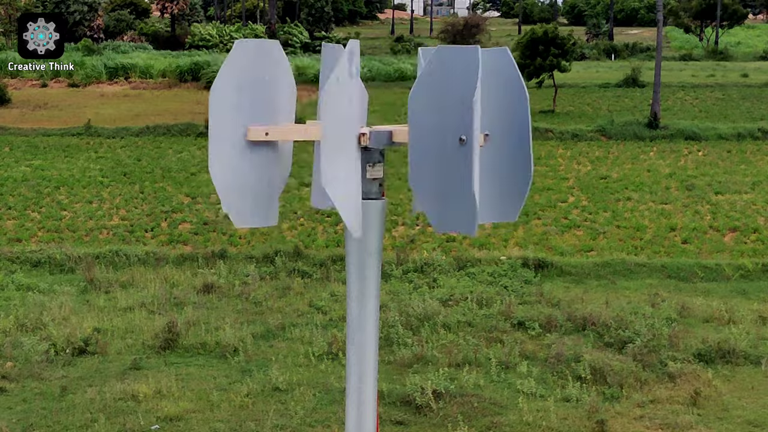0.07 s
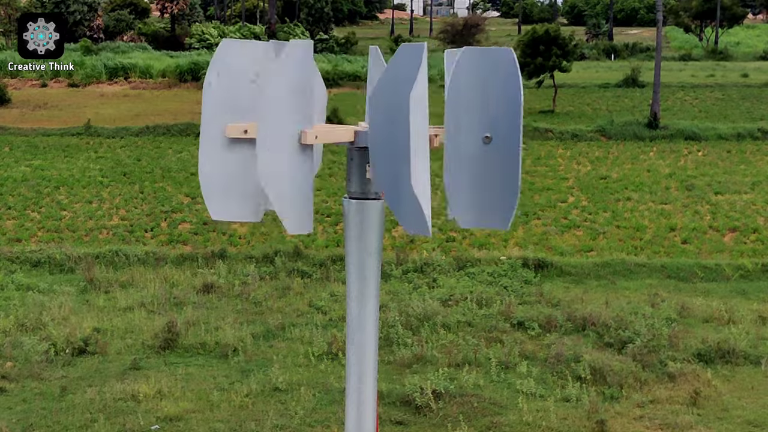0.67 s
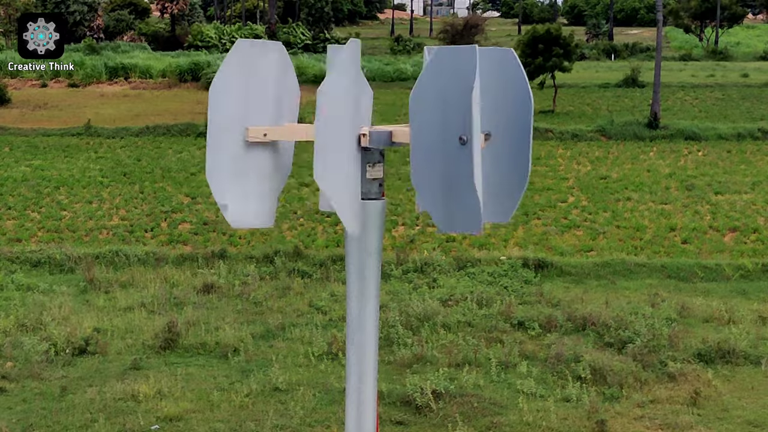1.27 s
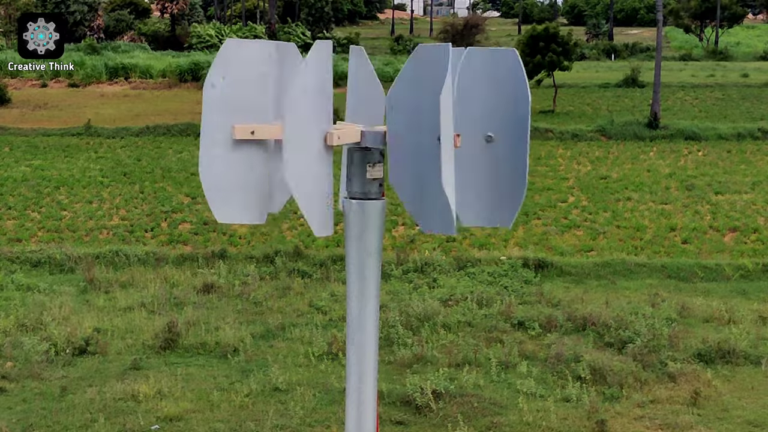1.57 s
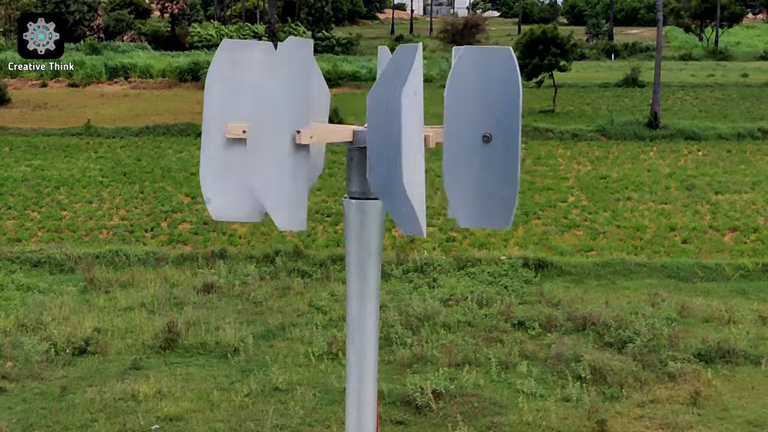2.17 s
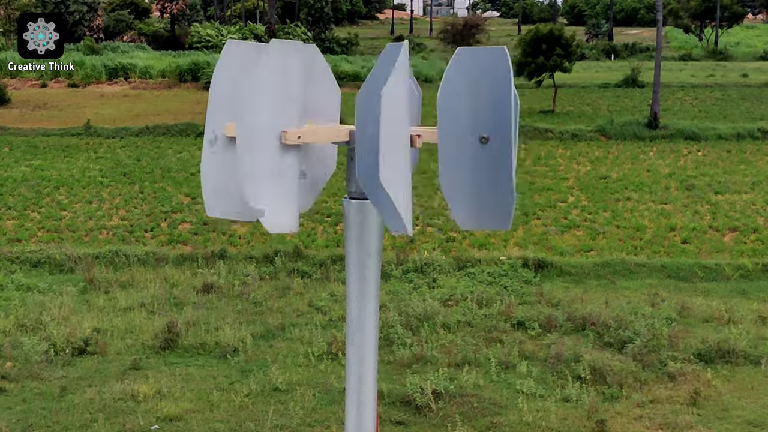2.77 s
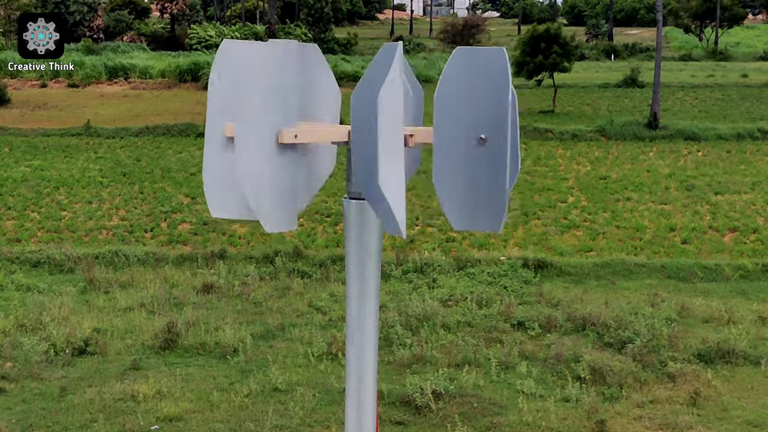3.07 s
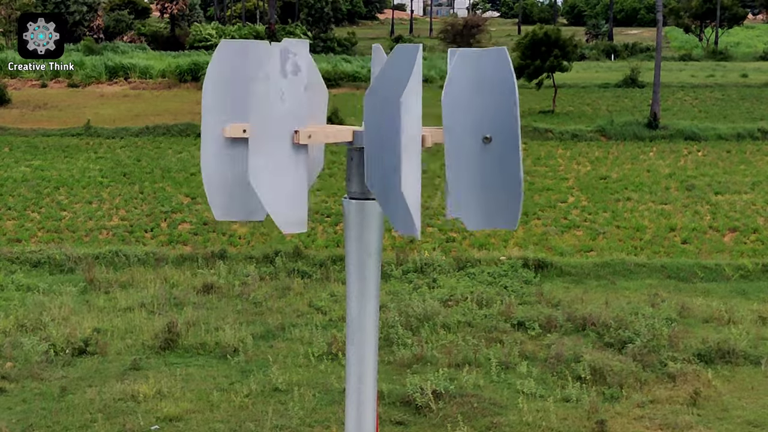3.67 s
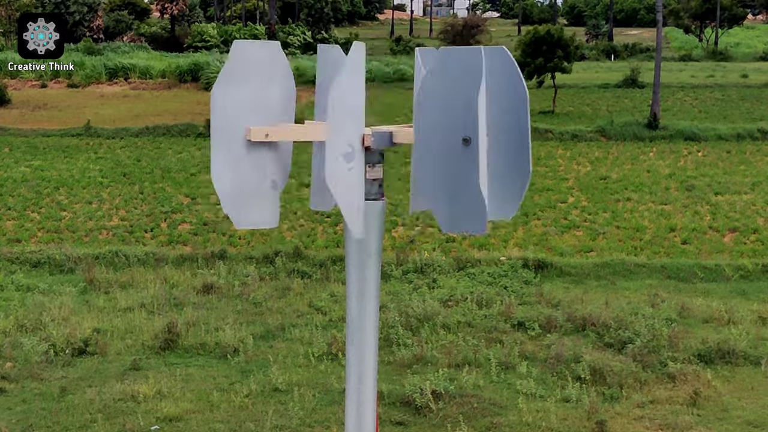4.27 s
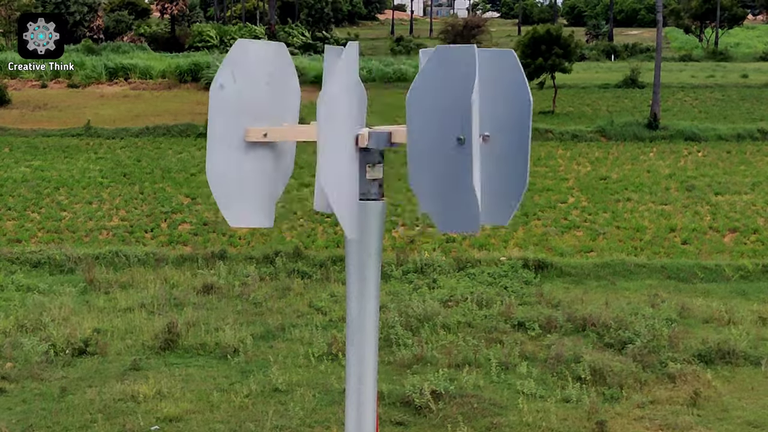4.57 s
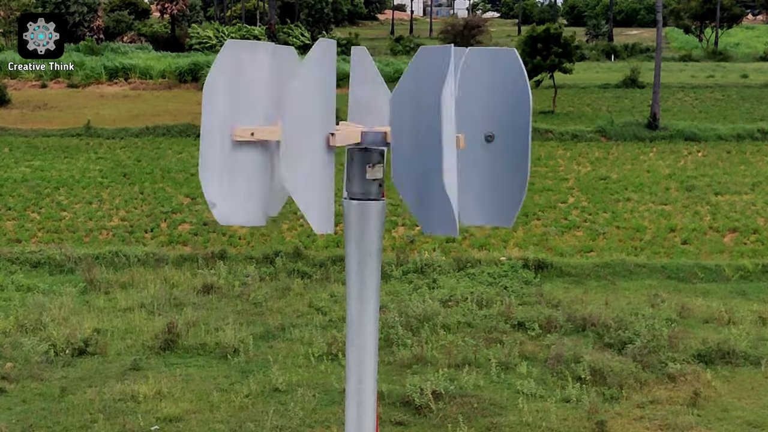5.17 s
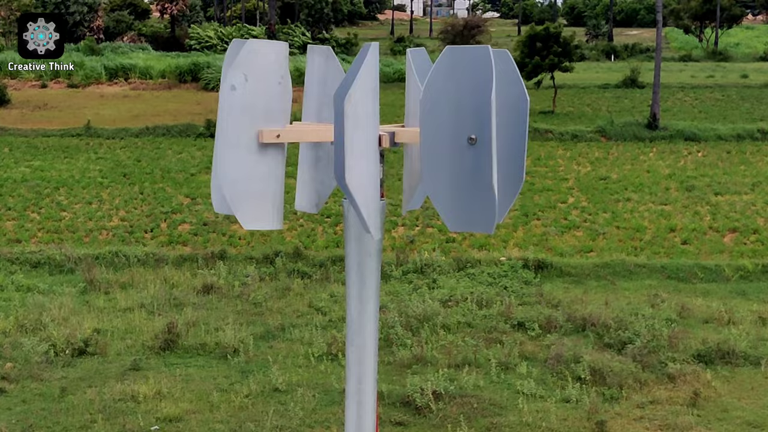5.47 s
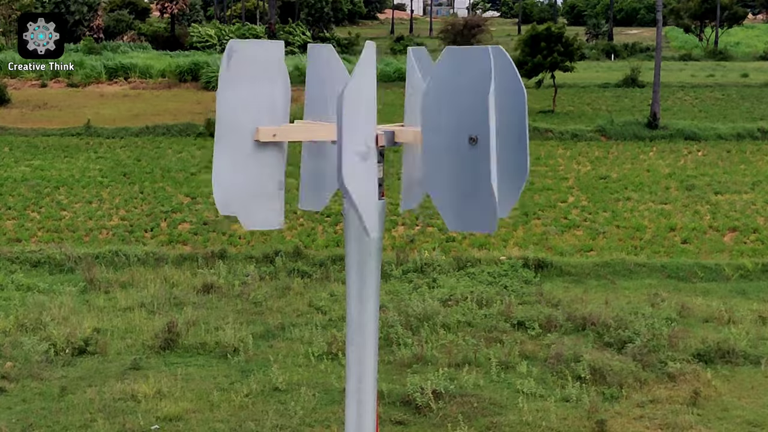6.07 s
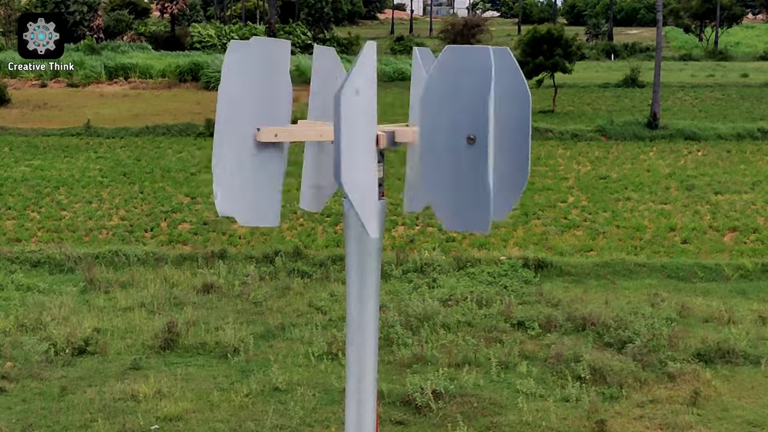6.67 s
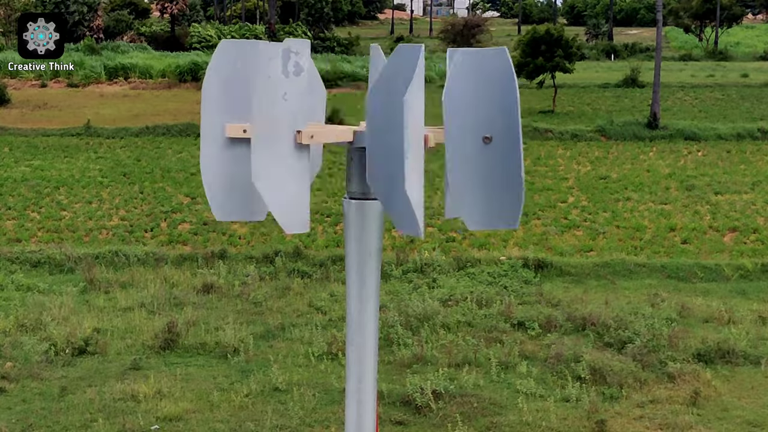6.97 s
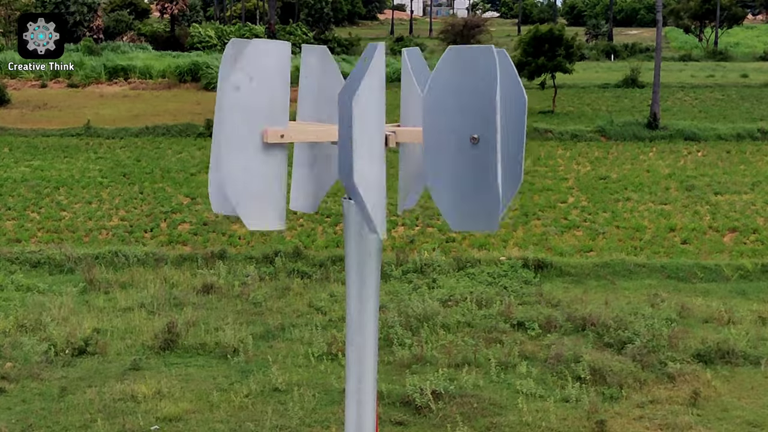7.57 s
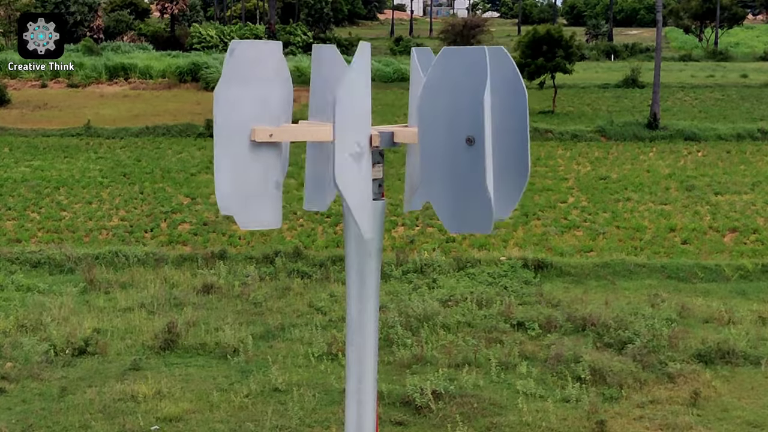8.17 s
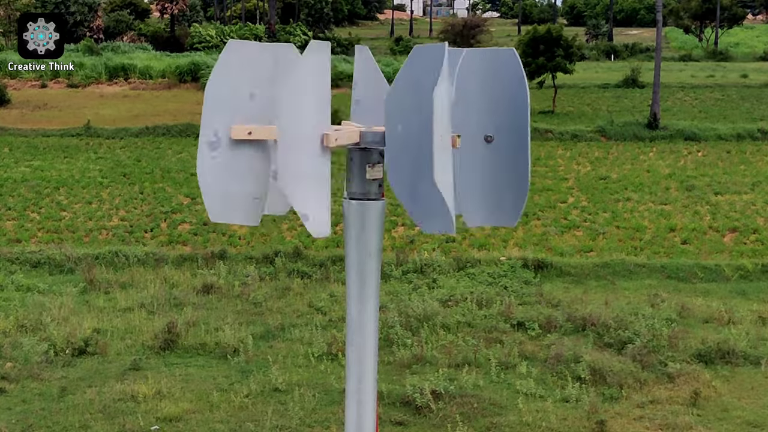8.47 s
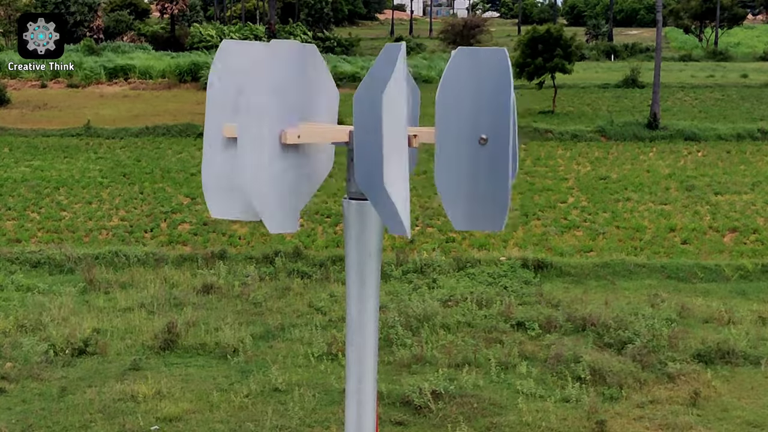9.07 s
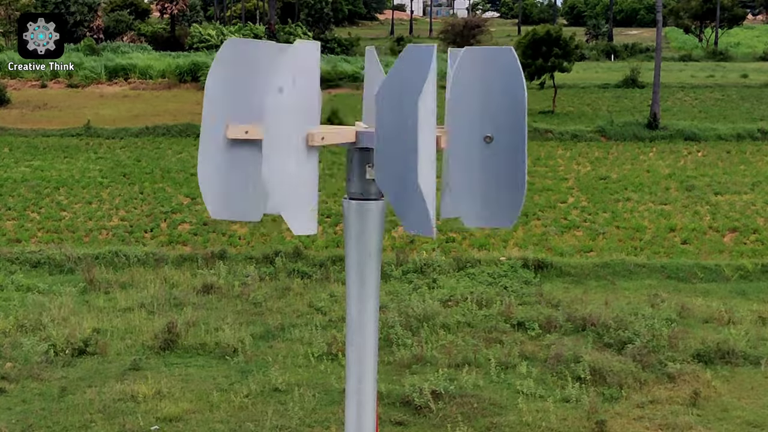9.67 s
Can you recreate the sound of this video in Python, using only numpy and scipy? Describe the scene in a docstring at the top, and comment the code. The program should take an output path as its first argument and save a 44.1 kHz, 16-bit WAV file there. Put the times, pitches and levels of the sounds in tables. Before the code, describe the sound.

Irregular gusts rumble and slap against the microphone outdoors, heavier on the right side. Small birds chirp quietly behind the wind, first in a short series, then in scattered twitters, with grass barely hissing around them. Two strong buffets, one early and one past the middle, crackle and make the level dip. In a lull afterwards a little wind rotor's bearing rubs faintly, then choppy puffs return and die away.

```python
"""Gusty wind in an open field

Wind buffets the two ports (openings) of a microphone, the right one most. Swirls of air rumble,
flap and pop, and the hardest slaps make the microphone turn itself down. Small birds chirp over
hissing grass. Late on, a little vane rotor on a pole groans faintly as its bearing rubs."""
import sys
import numpy as np
from scipy import signal
from scipy.fft import rfft, irfft, next_fast_len
from scipy.io import wavfile
from scipy.ndimage import uniform_filter1d, minimum_filter1d

SR = 44100
rng = np.random.default_rng(int(sys.argv[2]) if len(sys.argv) > 2 else 0)


def output_pcm(signal):
    """Save a mono or channel-first signal as 16-bit PCM at the path in sys.argv[1].

    Samples are clipped to [-1, 1] before scaling.
    """
    pcm = np.clip(np.atleast_2d(signal).T, -1, 1) * 32767
    wavfile.write(sys.argv[1], SR, np.round(pcm).astype(np.int16))


N = 437031
TIME = np.arange(N) / SR
SIZE = next_fast_len(N)
FREQS = np.maximum(np.arange(SIZE // 2 + 1) * SR / SIZE, 1)


def undb(db):
    """Turn decibels into a number to multiply by."""
    return 10 ** (np.asarray(db) / 20)


def curve(points):
    """Join (time, value) points with straight lines, one value per sample."""
    times, values = np.transpose(points)
    return np.interp(TIME, times, values)


def colour(points, hz):
    """Join (frequency, level) points on a scale of octaves and read off the levels at hz."""
    f, db = np.transpose(points)
    return np.interp(np.log(hz), np.log(f), db)


def noise(gains):
    """Noise of strength 1; gains says how much of each frequency it holds."""
    x = irfft(gains * np.exp(2j * np.pi * rng.random(len(FREQS))), SIZE)[:N]
    return x / x.std()


def wander(hz):
    """A random drift of typical size 1, wobbling up to about hz times a second."""
    return noise(1 / (1 + (FREQS / hz) ** 4))


def local_rms(x, seconds):
    """A sound's average strength over a short sliding window."""
    power = uniform_filter1d(x * x, max(int(seconds * SR), 1))
    return np.sqrt(np.maximum(power, 0) + 1e-12)


def ports(pan_db):
    """Left and right gains. Pan always means the left level minus the right level."""
    both = undb(np.vstack([pan_db, -pan_db]) / 2)
    return both / np.sqrt(np.mean(both ** 2, axis=0))


def add(out, s, sound):
    """Mix in a short stereo sound, starting at s seconds."""
    start = max(int(s * SR), 0)
    out[:, start:start + sound.shape[1]] += sound[:, :max(N - start, 0)]


def turbulence(flutter_db, eddy_hz=60, low_eddy_db=1.95, high_eddy_db=5, rumble_top_hz=130):
    """Eddies (swirls of air) push on a port, shaking the high flutter more than the low rumble."""
    # tone of the swirling air: f/Hz, level/dB
    air_tone = [(20, 0.5), (52, 0.5), (110, -4.5), (180, -8), (400, -20.5), (700, -35), (1200, -58),
                (2400, -82.5), (6000, -89)]
    spectrum = undb(colour(air_tone, FREQS))
    eddies, out = wander(eddy_hz), 0
    for hz in 25 * 2. ** np.arange(9):  # one band per octave
        gains = spectrum * np.cos(np.pi / 2 * np.clip(np.log2(FREQS / hz), -1, 1))
        height = np.clip(np.log2(hz / rumble_top_hz) / 2, 0, 1.25)  # 0 is rumble, about 1 is flutter
        band = noise(gains) * undb((low_eddy_db + height * high_eddy_db) * eddies)
        band = band / local_rms(band, 0.12)  # keep only the fast flicker
        out = out + band * np.sqrt(np.sum(gains ** 2)) * undb(height * flutter_db)
    return out / np.sqrt(np.sum(spectrum ** 2))


def gust(start, hold, rise_s=0.059, fall_s=0.068, puff_s=0.14):
    """A gust rises quickly, holds and dies away; one shorter than puff_s has steeper edges."""
    edge = np.sqrt(np.clip(hold / puff_s, .1, 1))
    rise = np.clip(1 + (TIME - start) / (edge * rise_s), 0, 1) ** 2
    fall = np.exp(-np.maximum(TIME - start - hold, 0) / (edge * fall_s))
    return rise * fall


def wind(shelter_db=-9.5, surge_hz=8, surge_db=1.5, flutter_surge_db=1.24):
    """Gusts ride on a breeze. Each port feels its own swirls, and the left one is sheltered."""
    # breeze on the right port: t/s, level/dB
    breeze = [(0.3, -15.5), (0.92, -19.5), (1.6, -23.5), (2.3, -14), (2.6, -17), (3.35, -20), (4.0, -24),
              (4.45, -23.5), (6.1, -14.5), (6.45, -11.5), (6.72, -29.5), (7.0, -29), (7.2, -45), (7.4, -38),
              (7.5, -29), (7.9, -17), (8.23, -27.5), (8.5, -22), (8.9, -25), (9.25, -23), (9.55, -33),
              (9.9, -43)]
    # gusts: t/s at full strength, hold/s, right level/dB, pan/dB, flutter/dB
    gusts = [(0.165, 0.075, -16, -9, 17.5), (0.585, 0.093, -10.5, -5, 3), (0.716, 0.064, -13, -7, 5.5),
             (1.13, 0.22, -16.5, -11.5, -1.5), (1.4, 0.042, -16, -14, -7), (1.518, 0.079, -18, -13, -4),
             (1.701, 0.035, -16.5, -13.5, 2.5), (1.847, 0.093, -15.5, -11.5, 1),
             (1.968, 0.065, -10.5, -5, 5.5), (2.045, 0.054, -6.5, 0, 2.5), (2.135, 0.044, -11, 0, 4),
             (2.434, 0.36, -17.5, -7, 3.5), (2.767, 0.38, -17.5, -7, 4.5), (3.437, 0.31, -19.5, -7, 0.5),
             (4.184, 0.31, -13.5, -11.5, 2.5), (4.739, 0.24, -12.5, -13, -2), (4.968, 0.41, -14.5, -9, 8),
             (5.652, 0.44, -17.5, -12.5, 5.5), (6.188, 0.069, -5.5, -20, -2.5), (6.22, 0.17, -12.5, 1, 1.5),
             (6.774, 0.024, -13.5, -19, -7.5), (6.871, 0.013, -14, -28, -3), (6.937, 0.025, -18, -7, -7),
             (6.99, 0.038, -19, -12, -2.5), (7.072, 0.036, -17.5, -12, -5.5), (7.234, 0.056, -26, -9, 3.5),
             (7.509, 0.46, -14.5, -15.5, 4), (8.11, 0.027, -19, -11, 5.5), (8.337, 0.06, -28, -3, 11),
             (8.507, 0.064, -18.5, -11, 3.5), (8.605, 0.045, -17.5, -17, 11), (8.675, 0.079, -13.5, -13, 0),
             (8.823, 0.038, -15.5, -7.5, 0.5), (8.956, 0.037, -14, -19, 4.5), (9.041, 0.025, -18, -13, 6),
             (9.175, 0.079, -23.5, -4, 3), (9.318, 0.02, -33, 6.5, -8), (9.839, 0.014, -23, -15, -16.5)]
    breeze_db = curve(breeze)
    breeze_flutter_db = -5 + 0.5 * (breeze_db + 20)  # slower air flutters less
    out = []
    for is_left in (1, 0):
        power = undb(breeze_db + is_left * shelter_db) ** 2
        flutter = power * breeze_flutter_db
        surge = wander(surge_hz)
        for s, hold, db, pan_db, gust_flutter_db in gusts:
            blow = (undb(db + is_left * pan_db) * gust(s, hold)) ** 2
            power += blow
            flutter += blow * gust_flutter_db
        flutter_db = flutter / power + flutter_surge_db * surge  # the strongest flow counts most
        out.append(turbulence(flutter_db) * np.sqrt(power) * undb(surge_db * surge))
    return np.array(out)


def grass_hiss(gain_db=10.5, spacing_m=.14, sound_m_per_s=347.0, flicker_db=1.16):
    """Grass and far trees hiss all around; only waves longer than the port spacing reach both alike."""
    # loudness of the hiss: t/s, level/dB
    loudness = [(0, -66.5), (2.2, -66.5), (2.45, -62.5), (2.8, -67), (3.4, -70), (4.1, -66.5), (5.5, -70.5),
                (7.25, -68.5), (9.91, -69.5)]
    # tone of the hiss: f/Hz, level/dB
    hiss_tone = [(150, 1), (500, 15.5), (900, 16.5), (1300, 14.5), (1900, 11), (2600, 10), (3500, 11),
                 (4600, 6.5), (7000, 3.5), (11000, 2), (12500, -1.5), (14000, -8.5), (16000, -6.5)]
    # which side the hiss leans to: f/Hz, pan/dB
    lean = [(500, 1.5), (2000, -0.5), (4000, 1), (8000, 1.5), (11000, 3.5), (13500, -3.5)]
    gains = undb(colour(hiss_tone, FREQS))
    alike = np.sinc(2 * FREQS * spacing_m / sound_m_per_s)
    mid, side = noise(gains * np.sqrt(1 + alike)), noise(gains * np.sqrt(1 - alike))
    pair = np.array([mid + side, mid - side]) / np.sqrt(2)
    pair = irfft(rfft(pair, SIZE) * ports(colour(lean, FREQS)), SIZE)[:, :N]
    return pair * undb(curve(loudness) + gain_db + flicker_db * wander(hz=22))


def slaps(gain_db=-2, ragged_db=3, ragged_hz=170, tilt_from_hz=400, size=8192):
    """A fast eddy breaks right on a port in a short, ragged burst; weaker slaps are duller."""
    # eddies that hit: t/s at the middle, level/dB, half length/s, pan/dB
    hits = [(0.138, -8.5, 0.03, -35), (0.246, -9.5, 0.0058, -9), (0.288, -15, 0.0048, -14),
            (0.604, -10.5, 0.0049, -26), (0.811, -11.5, 0.0051, -16), (0.9, -12.5, 0.0035, 8),
            (1.139, -14, 0.0061, -20), (1.968, -9, 0.0047, -12), (2.008, -10, 0.0071, -23),
            (2.036, -7, 0.013, -5), (2.489, -9.5, 0.0055, -4), (2.605, -8, 0.0078, -32),
            (3.579, -9.5, 0.0061, -3), (3.688, -11, 0.0035, -20), (4.166, -13.5, 0.0047, -30),
            (4.244, -10, 0.0047, 0), (4.368, -8, 0.0054, -35), (4.381, -8, 0.01, -35),
            (4.929, -8, 0.017, -24), (5.043, -8, 0.0069, -19), (5.105, -10.5, 0.0052, 5),
            (5.17, -17, 0.0018, -25), (5.199, -12, 0.0043, -20), (5.236, -8.5, 0.011, -36),
            (5.335, -8.5, 0.0058, -35), (5.672, -10, 0.0071, -25.5), (5.774, -8, 0.009, -37),
            (5.892, -9, 0.0062, -30), (6.166, -8.5, 0.0077, -36), (6.223, -6, 0.022, -43),
            (6.309, -7.5, 0.0061, 16), (6.408, -8.5, 0.0059, -8), (6.439, -8, 0.0067, 22),
            (6.783, -12.5, 0.0051, -26), (6.801, -15, 0.0051, -22), (6.892, -25, 0.004, -17),
            (6.95, -15, 0.0058, -19), (6.993, -16.5, 0.0039, -16), (7.096, -19, 0.0032, -20),
            (7.509, -13, 0.005, -29), (7.573, -10, 0.0077, -28), (7.626, -12, 0.004, -16),
            (7.701, -17, 0.0036, -24), (7.802, -14, 0.0077, -14), (7.967, -8.5, 0.0074, -19),
            (8.006, -10.5, 0.0044, -15), (8.074, -16.5, 0.0043, -1), (8.366, -10, 0.00393, -14),
            (8.548, -10, 0.0044, -21), (8.596, -10.5, 0.0047, -28), (8.628, -9, 0.0078, -30),
            (8.675, -15, 0.0058, -19), (8.828, -21, 0.0056, -5), (8.865, -12, 0.0033, -15),
            (8.962, -12, 0.0043, -22.5), (9.2, -22, 0.0052, -3), (9.267, -29, 0.0039, -1)]
    # tone of a slap: f/Hz, level/dB
    slap_tone = [(40, 17.5), (150, 8.5), (400, 1), (800, -5.5), (1300, -19.5), (2300, -41.5), (3500, -55.5),
                 (7000, -73), (14000, -67)]
    out = np.zeros((2, N))
    ragged = undb(ragged_db * wander(ragged_hz))
    hz = np.maximum(np.arange(size // 2 + 1) * SR / size, 1)
    octaves = np.clip(np.log2(hz / tilt_from_hz), 0, 6.6)
    for s, db, half_s, pan_db in hits:
        db_per_octave = np.clip(2.86 * (db + 8), -8, 4.9)
        gains = undb(colour(slap_tone, hz) + db_per_octave * octaves)
        swell = np.hanning(min(int(2 * half_s * SR), size))
        burst = irfft(gains * np.exp(2j * np.pi * rng.random((2, len(hz)))))[:, :len(swell)]
        burst *= swell * ragged[int(s * SR):][:len(swell)]
        # a slap is as hard as its waves are steep, so scale it by steepness
        steepness = 2 * np.pi / SR * np.sqrt(np.average(hz ** 2, weights=gains ** 2))
        burst *= steepness * np.sqrt(np.mean(swell ** 2)) / np.diff(burst).std(axis=1, keepdims=True)
        add(out, s - half_s, burst * undb(db + gain_db) * ports(pan_db))
    return out


def pops(gain_db=3, pan_db=-22, hollow_hz=1400, rise_s=0.00037, crack_s=0.0013, rattle_s=0.0045):
    """Sudden jumps in pressure crack on the right port and briefly ring the small hollow behind it."""
    # pressure jumps: t/s, level/dB
    jumps = [(0.167, -30.5), (0.603, -35), (1.963, -37.5), (2.001, -47), (2.01, -30.5), (2.029, -26),
             (2.037, -30), (2.042, -27), (2.048, -28), (2.059, -33), (2.078, -38), (2.603, -41.5),
             (3.687, -44.5), (4.368, -42), (4.38, -31), (4.919, -33), (4.929, -31), (4.938, -32),
             (5.047, -43), (5.164, -31.5), (5.237, -28.5), (5.261, -35), (5.385, -39), (5.777, -29),
             (6.196, -37), (6.216, -28.5), (6.224, -14), (6.236, -26), (7.799, -43), (7.961, -42),
             (7.969, -49), (8.865, -45.5)]
    out, t = np.zeros((2, N)), TIME[:512]
    ring_shape = (t / rise_s) * np.exp(1 - t / rise_s)
    crack_shape = (t / crack_s) * np.exp(1 - t / crack_s)
    crisp = signal.butter(2, [750, 3000], "bandpass", fs=SR, output="sos")
    for s, db in jumps:
        gains = undb(db + gain_db) * ports(pan_db)
        crack = signal.sosfilt(crisp, rng.standard_normal(len(t)))
        crack_db = -14 + 0.41 * min(db + 18, 0)  # soft pops hardly crack
        add(out, s - crack_s, crack / crack.std() * crack_shape * undb(crack_db) * gains)
        for kick, (pitch, push, when) in enumerate(rng.random((3, 3)) - .5):
            weaker = kick > 0  # two weaker kicks crowd around the main one
            ring = np.sign(push) * ring_shape * np.sin(2 * np.pi * hollow_hz * (1 + .5 * pitch) * t)
            add(out, s + weaker * 2 * when * rattle_s, ring * undb(-6 * weaker) * gains)
    return out


def trill_pitch(length, hz, rise_oct, scoop_oct=0.072, scoop_s=0.0048):
    """A bird's pitch scoops up from below, then rises steadily."""
    t = TIME[:int(length * SR)]
    return hz * 2 ** (rise_oct * (t / length - .5) - scoop_oct * np.exp(-t / scoop_s))


def chirp_pitch(length, hz, glide_oct, bend=0.25):
    """A bird's pitch slides up or down, flattening at its high end."""
    progress = np.linspace(0, 1, int(length * SR))
    arch = bend * abs(glide_oct) * (2 * progress - 1) ** 2
    return hz * 2 ** (glide_oct * (progress - .5) - arch)


def swoop_pitch(length, from_hz, to_hz, settle_s=0.0049):
    """A bird's pitch drops steeply and settles."""
    return to_hz + (from_hz - to_hz) * np.exp(-TIME[:int(length * SR)] / settle_s)


def whistle(hz, pan_db, unsteady, lead_s=0.000258, waver=0.0065, quiver_db=1.0):
    """One bird note, quivering in pitch and level; it reaches the nearer port first."""
    quiver = unsteady[:len(hz)]
    cycles = np.cumsum(hz * (1 + waver * quiver)) / SR
    lead = hz * lead_s * np.sign(pan_db) * np.array([[.5], [-.5]])
    swell = np.abs(np.sin(np.pi * np.linspace(0, 1, len(hz)))) ** 0.55
    return np.sin(2 * np.pi * (cycles + lead)) * swell * undb(quiver_db * quiver) * ports(pan_db)


def birds(gain_db=2, trill_pan_db=4, half_echo_db=-62, echo_s=0.33, twitter_s=0.0244, twitter_oct=0.217):
    """Near birds sound clear; the fainter and farther a bird, the more of it echoes off the trees."""
    # one bird's run of rising notes: t/s, length/s, level/dB, f/Hz, rise/octaves
    trill = [(0.309, 0.05, -48.5, 3930, 0.1), (0.434, 0.06, -51, 3960, 0.055),
             (0.57, 0.048, -51, 4000, 0.06), (0.705, 0.056, -46.5, 4020, 0.018),
             (0.843, 0.049, -46, 4010, 0.038), (0.98, 0.044, -46, 4080, 0.024),
             (1.119, 0.048, -46.5, 4000, 0.059), (1.387, 0.044, -52, 3880, 0.041),
             (1.508, 0.046, -52.5, 3870, 0.0052), (1.634, 0.058, -53.5, 3840, 0.065),
             (1.763, 0.064, -54, 3770, 0.031), (1.903, 0.054, -56, 3880, 0.071)]
    # other birds' single chirps: t/s, length/s, f/Hz, glide/octaves, level/dB, pan/dB
    chirps = [(1.159, 0.037, 3670, 0.04, -54, 1), (1.58, 0.083, 8700, 0.83, -62, 1),
              (2.039, 0.035, 5100, 0.25, -51, 6), (2.115, 0.022, 3750, -0.33, -55, 1),
              (2.173, 0.03, 1414, -0.086, -47, -11), (2.372, 0.049, 7700, 0.15, -61.5, -6),
              (2.493, 0.033, 7660, 0.2, -54, 0), (2.75, 0.03, 8100, -0.12, -70, 1),
              (2.95, 0.014, 3760, -0.36, -62, -3), (3.016, 0.052, 8040, -0.2, -61.5, 13),
              (3.057, 0.032, 4820, -0.03, -61, -8), (3.103, 0.031, 8100, -0.16, -68, 8),
              (3.226, 0.018, 7650, -0.2, -62, 5), (3.26, 0.037, 7530, -0.21, -66, 3),
              (3.088, 0.012, 3870, -0.39, -57.5, -5), (3.181, 0.054, 4930, -0.062, -62, -8),
              (3.31, 0.038, 7700, -0.24, -60, 13), (3.337, 0.043, 5050, -0.09, -54, -8),
              (3.372, 0.041, 8660, 0.13, -62, 7), (3.355, 0.035, 7500, 0.08, -66, 3),
              (3.584, 0.04, 8100, -0.15, -67, 3), (3.773, 0.029, 7800, -0.26, -62, 4),
              (3.851, 0.076, 7500, -0.39, -58, 2), (3.373, 0.014, 3790, -0.78, -57.5, 1),
              (5.406, 0.037, 2950, 0.25, -60, -8), (5.438, 0.03, 3100, -0.25, -60, -5),
              (5.876, 0.08, 9200, 0.38, -68, 3), (5.942, 0.045, 8300, -0.65, -71, 7),
              (5.968, 0.027, 3010, -0.0049, -59, 1), (7.89, 0.011, 11500, -0.39, -63, 1),
              (8.623, 0.028, 10800, 0.62, -59.5, 0), (2.28, 0.056, 4100, 0.05, -65, -4.5),
              (2.357, 0.035, 5000, 0.03, -64, -4), (2.38, 0.06, 3830, 0.03, -63, -0.5),
              (2.62, 0.03, 5000, 0.03, -61, -7), (2.637, 0.044, 3600, -0.11, -60, 1.5),
              (2.655, 0.027, 4850, -0.04, -60, -4), (7.572, 0.04, 3620, -0.022, -63, 0),
              (8.514, 0.035, 3870, 0.16, -66, 1), (8.677, 0.03, 4350, -0.2, -64, 1),
              (8.94, 0.068, 3850, 0.02, -68, 1), (8.99, 0.032, 4200, -0.04, -68, 0),
              (9.17, 0.06, 4400, 0.011, -67, 3), (9.47, 0.05, 3350, -0.05, -71, 6)]
    # far birds twittering: start/s, end/s, lowest f/Hz, highest f/Hz, level/dB
    twitters = [(2.295, 4.299, 2860, 5300, -66), (2.552, 3.905, 7220, 8560, -62),
                (8.304, 9.692, 3150, 4490, -66)]
    # thin falling calls: t/s, length/s, first f/Hz, final f/Hz, level/dB, pan/dB
    swoops = [(7.694, 0.016, 7200, 5850, -62, 5), (7.708, 0.044, 5370, 4330, -64, 5),
              (7.889, 0.018, 8500, 5600, -57, 10), (7.905, 0.045, 5900, 4220, -68, 2),
              (8.082, 0.016, 8800, 5830, -64, -3)]
    direct, scattered = np.zeros((2, N)), np.zeros((2, N))
    unsteady = wander(hz=220)
    notes = [(s, trill_pitch(length, hz, rise), db, trill_pan_db) for s, length, db, hz, rise in trill]
    notes += [(s, chirp_pitch(*shape), db, pan_db) for s, *shape, db, pan_db in chirps]
    notes += [(s, swoop_pitch(*shape), db, pan_db) for s, *shape, db, pan_db in swoops]
    for s, hz, db, pan_db in notes:
        note = whistle(hz, pan_db, unsteady[int(s * SR):]) * undb(db + gain_db)
        echo_share = 1 / (1 + undb(db - half_echo_db) ** 2)
        add(direct, s, note * np.sqrt(1 - echo_share))
        add(scattered, s, note * np.sqrt(echo_share))
    for start, end, low_hz, high_hz, db in twitters:
        for when, pitch, slope, place in rng.random((18, 4)):  # 18 notes, heard only as echo
            centre_hz = low_hz + pitch * (high_hz - low_hz)
            hz = chirp_pitch(twitter_s, centre_hz, twitter_oct * np.sign(slope - .5))
            note = whistle(hz, 6 * place - 2, unsteady) * undb(db + gain_db)
            add(scattered, start + when * (end - start), note)
    trees = rng.standard_normal((2, SR)) * undb(-60 * TIME[:SR] / echo_s)
    trees /= np.sqrt(np.sum(trees[0] ** 2))
    return direct + signal.fftconvolve(scattered, trees, axes=1)[:, :N]


def flurries(ragged_db=4.5, ragged_hz=90):
    """Air tears off the edge of a port in a rough flapping that swells and dies away."""
    # spells of flapping: t/s at the peak, rise/s, fall/s, level/dB, pan/dB
    spells = [(0.621, 0.022, 0.066, -28, -8), (2.036, 0.04, 0.042, -17.5, -9),
              (2.065, 0.017, 0.033, -25.5, 21), (2.13, 0.03, 0.058, -29.5, -5),
              (3.11, 0.055, 0.022, -36.5, -3), (4.975, 0.032, 0.018, -28, -6),
              (5.119, 0.012, 0.039, -32, -5), (5.386, 0.041, 0.039, -27, -25),
              (5.9, 0.036, 0.048, -26.5, -29), (6.222, 0.051, 0.059, -23.5, -24.5),
              (6.275, 0.046, 0.043, -39, -6), (6.4, 0.066, 0.055, -27, 16)]
    # tone of the flapping: f/Hz, level/dB
    flap_tone = [(30, -15), (120, -8), (300, 10), (500, 6), (900, -5), (1300, -14), (2000, -32.5),
                 (3000, -40), (6000, -50), (14000, -75)]
    swell = np.zeros((2, N))
    for s, rise, fall, db, pan_db in spells:
        shape = np.exp(-((TIME - s) / np.where(TIME < s, rise, fall)) ** 2)
        swell += shape * undb(db) * ports(pan_db)
    gains = undb(colour(flap_tone, FREQS))
    flaps = [noise(gains) * undb(ragged_db * wander(ragged_hz)) for port in range(2)]
    return swell * np.array([flap / local_rms(flap, 0.022) for flap in flaps])


def resonance(hz, width_hz):
    """Gains that favour the frequencies near hz, as a ringing object does."""
    return 1 / (1 + (2 * (FREQS - hz) / width_hz) ** 2)


def rotor(pan_db=1):
    """The bearing rubs now and then with a dry scrape and sets the vanes ringing."""
    # rubs of the bearing: t/s, length/s, ring level/dB, scrape level/dB
    rubs = [(7.228, 0.15, -47.5, -62.5), (7.53, 0.083, -50, -68), (8.32, 0.18, -47.5, -75)]
    # tones of the vanes: f/Hz, width/Hz, level/dB
    vane_tones = [(424.5, 8.6, 8), (665, 42, -15), (1265, 120, -24.5), (1460, 110, -30)]
    ring = noise(sum(undb(db) * resonance(hz, width) for hz, width, db in vane_tones))
    ring /= local_rms(ring, 0.039)
    scrape = noise(resonance(hz=3400, width_hz=2600))
    out = np.zeros(N)
    for s, length, ring_db, scrape_db in rubs:
        swell = np.sin(np.pi * np.clip((TIME - s) / length, 0, 1))
        out += (undb(ring_db) * ring + undb(scrape_db) * scrape) * swell
    return out * ports(pan_db)


def gain_control(x, threshold_db=-27, deaf_below_hz=550, strength=0.72, recovery_db_per_s=13,
                 attack_s=0.0083, lag_s=0.015):
    """Just after a sharp buffet (not plain rumble) all sound is turned down, then creeps back up."""
    sensed = signal.sosfilt(signal.butter(2, deaf_below_hz, "highpass", fs=SR, output="sos"), x)
    level_db = 20 * np.log10(local_rms(sensed, seconds=0.0039).max(axis=0))
    over_db = strength * np.maximum(level_db - threshold_db, 0)
    recovered_db = recovery_db_per_s * TIME
    cut_db = np.maximum.accumulate(over_db + recovered_db) - recovered_db
    cut_db = uniform_filter1d(cut_db, int(attack_s * SR))
    return x * undb(-np.interp(TIME - lag_s, TIME, cut_db))


def scene(silent_s=0.084, fade_s=0.2):
    """Wind on the ports over the sounds of the field; it all fades in quickly."""
    fade_in = np.clip((TIME - silent_s) / fade_s, 0, 1)
    return (wind() + flurries() + slaps() + pops() + grass_hiss() + birds() + rotor()) * fade_in


def record(dry, ceiling=0.45, hold_s=0.00067, top_hz=15480):
    """The microphone turns down after buffets, flattens the tallest waves and cuts the top treble."""
    x, hold = gain_control(dry), int(hold_s * SR)
    gain = minimum_filter1d(ceiling / np.maximum(np.abs(x), ceiling), hold)
    gain = uniform_filter1d(uniform_filter1d(gain, hold // 2), hold // 2)
    treble_cut = signal.ellip(10, .2, 70, top_hz, fs=SR, output="sos")
    return signal.sosfilt(treble_cut, x * gain)


dry = scene()
out = record(dry)
output_pcm(out)
```